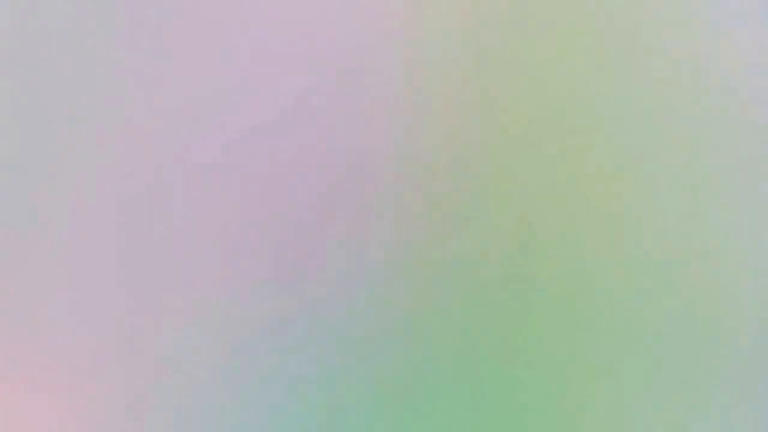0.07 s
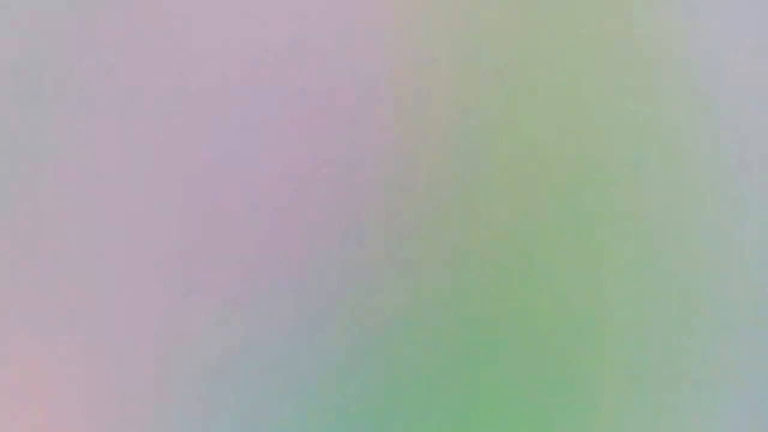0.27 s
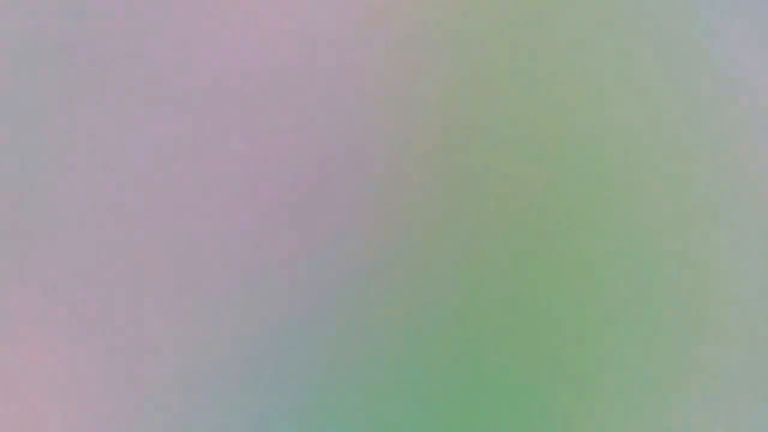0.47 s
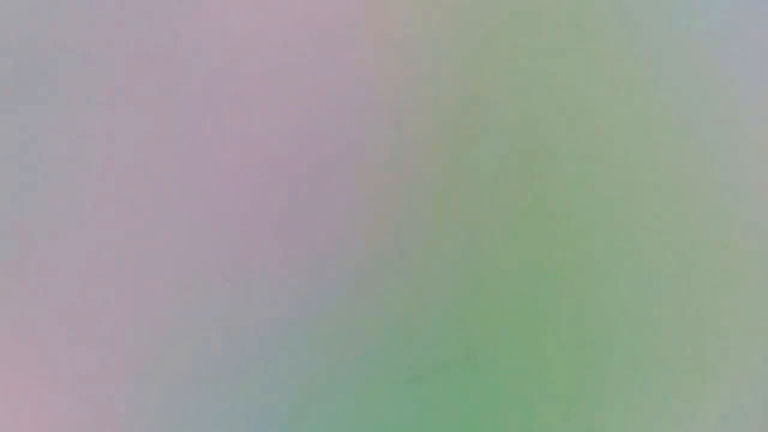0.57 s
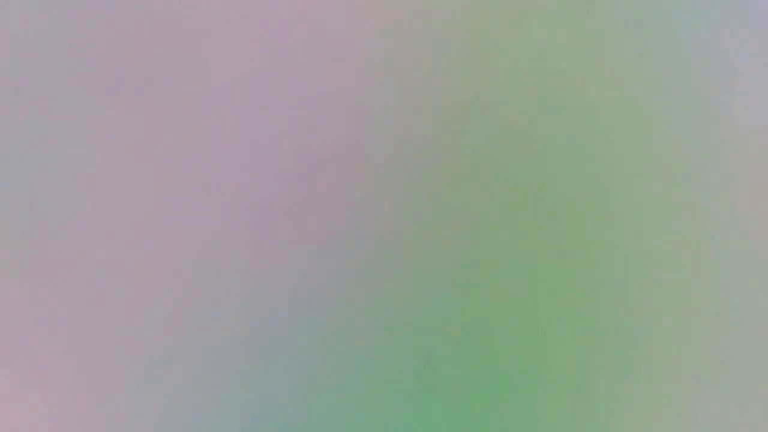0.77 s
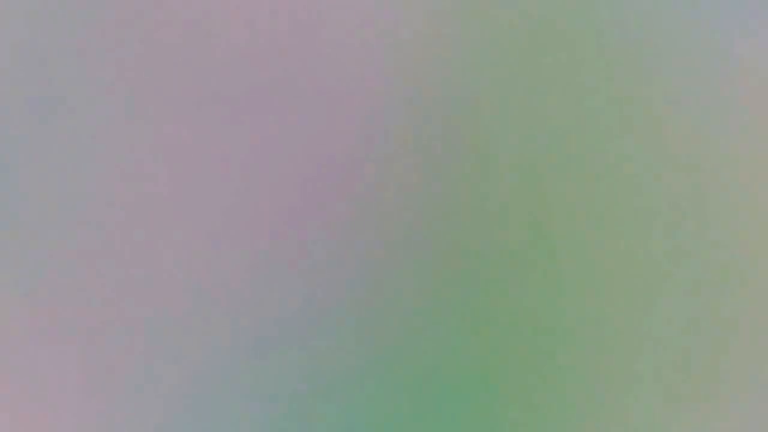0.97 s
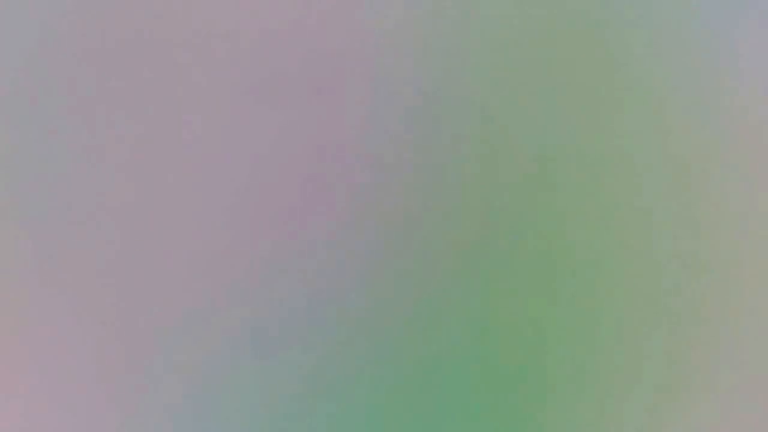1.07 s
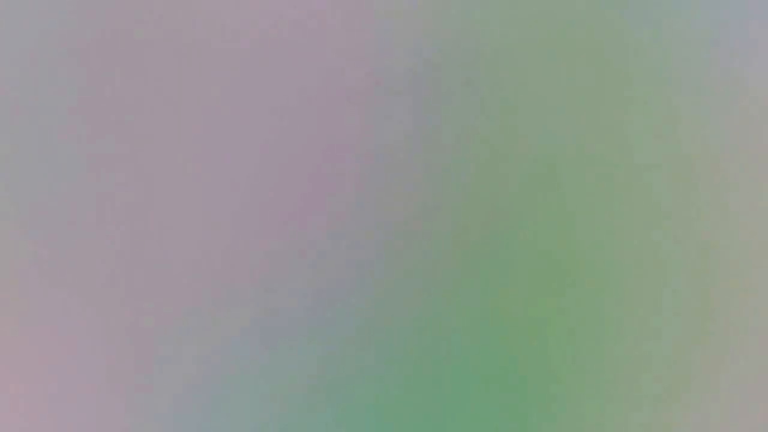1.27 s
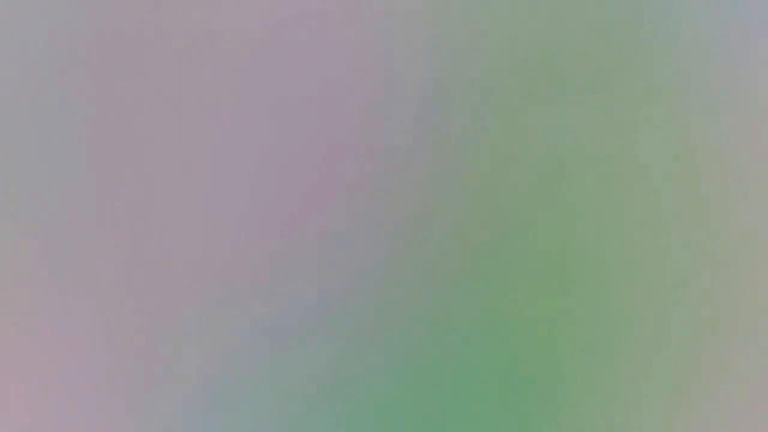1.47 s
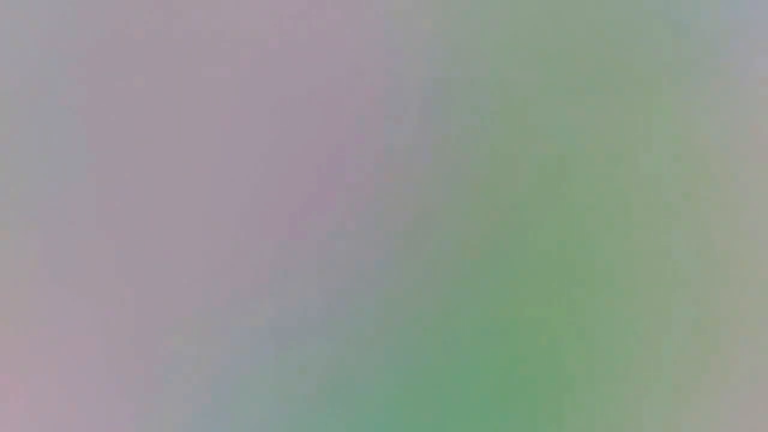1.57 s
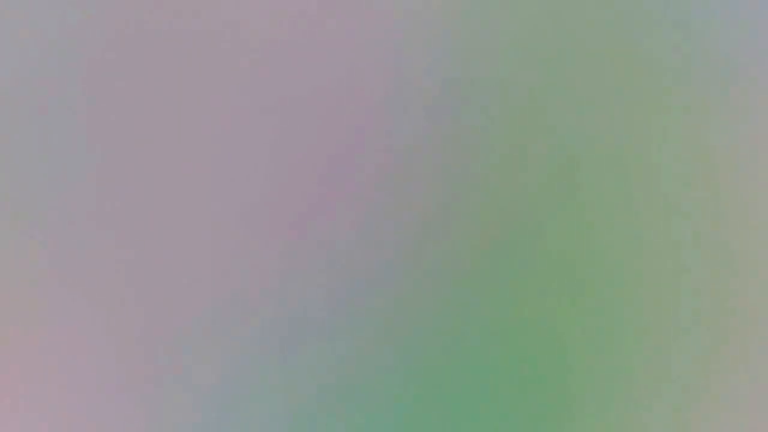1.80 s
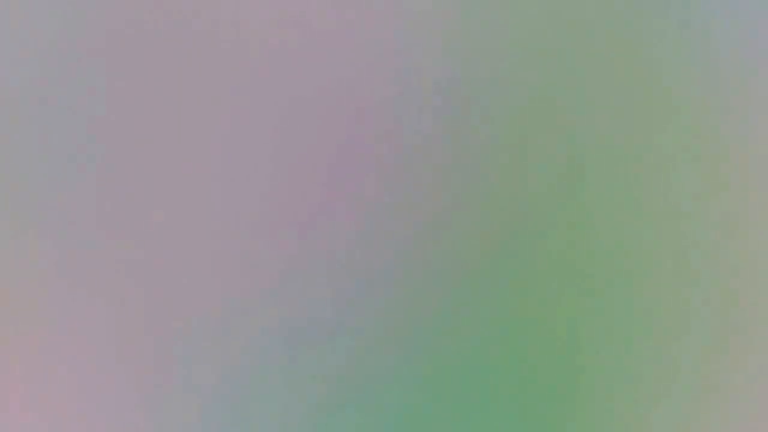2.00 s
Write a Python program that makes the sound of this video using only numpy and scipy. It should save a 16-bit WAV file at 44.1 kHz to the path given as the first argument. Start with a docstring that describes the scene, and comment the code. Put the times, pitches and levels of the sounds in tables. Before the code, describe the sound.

Footsteps crunch in snow as a metal pole scrapes and rings, with low handling thumps close by

```python
"""Someone walks through snow with a metal pole, heard close by a small pair of microphones.
Snow crunches underfoot as dull and crisp grains, and cloth swishes as finer grains in the treble.
Each move thumps through the microphone's housing as a low, sagging swing with an uneven rumble.
The pole rings in its bending modes when its tip scrapes or taps the crust; bits of crust rustle,
a small hard part ticks, and quiet air and hiss lie underneath."""
import sys
import numpy as np
from scipy import signal
from scipy.fft import rfft, irfft
from scipy.io import wavfile
from scipy.ndimage import uniform_filter1d

SR = 44100
rng = np.random.default_rng(int(sys.argv[2]) if len(sys.argv) > 2 else 0)


def generate_wav(signal):
    """Clip the signal to [-1, 1] and save it as 16-bit WAV at the path in sys.argv[1]."""
    frames = np.transpose(np.atleast_2d(signal))
    scaled = np.clip(frames, -1, 1) * 32767
    pcm = np.round(scaled).astype(np.int16)
    wavfile.write(sys.argv[1], SR, pcm)


def magnitude_from_level(level_db):
    """Linear magnitude for a level in decibels (20 dB per decade)."""
    exponent = np.asarray(level_db, float) / 20
    return 10 ** exponent


N = 90052  # length in samples
SNOW_GRAINS_PER_S, SNOW_SPREAD_DB = 3500, 2.5  # for crunch and rustle


def evened(x):
    """Scales to rms 1."""
    return x / np.sqrt(np.mean(x ** 2) + 1e-20)


def colour(x, points):
    """Filters x by a spectrum of (f/Hz, level/dB) points, joined along log frequency."""
    f, db = np.transpose(points)
    hz = np.fft.rfftfreq(x.shape[-1], 1 / SR)
    gain = magnitude_from_level(np.interp(np.log(hz + 1), np.log(f + 1), db))
    return irfft(rfft(x) * gain, x.shape[-1])


def level(curve):
    """Gain over time from rows that begin (t/s, level/dB)."""
    s, db = np.transpose(curve)[:2]
    return magnitude_from_level(np.interp(np.arange(N) / SR, s, db))


def add(mix, s, sound):
    """Mixes a sound in at time s, cut at the end of the mix."""
    part = mix[round(s * SR):][:len(sound)]
    part += sound[:len(part)]


def grains(per_s, spread_db):
    """Sparse clicks at random times, of random sign and uneven size."""
    size = magnitude_from_level(spread_db * np.minimum(rng.exponential(1, N), 5))
    struck = rng.random(N) < per_s / SR
    return size * struck * rng.choice([-1., 1.], N)


def patchy(x):
    """Lets random patches of time and frequency swell and sink."""
    patch_db = 3  # rms swing
    z = signal.stft(x, nperseg=256)[2]
    field = uniform_filter1d(rng.standard_normal(z.shape), 8, 0)
    field = evened(uniform_filter1d(field, 8, 1))
    return signal.istft(z * magnitude_from_level(patch_db * field), nperseg=256)[1][:N]


def crunch():
    """Snow packs down dully while crystals break in crisp grains; the share sets the power of each."""
    # loudness of the snow and how crisp it is: t/s, level/dB, crisp share/0-1
    steps = [(0, -58.5, 1), (0.018, -63, 0.3), (0.053, -52, 0.04), (0.07, -69, 0), (0.13, -62, 1),
             (0.172, -69, 0.35), (0.182, -42.5, 0), (0.205, -52.5, 0.53), (0.25, -53, 1),
             (0.268, -57, 0.98), (0.39, -55.5, 0.53), (0.438, -40.5, 0.06), (0.462, -60, 0.63),
             (0.495, -56.5, 0.63), (0.517, -48.5, 0.55), (0.564, -60.5, 0.04), (0.593, -51, 0.49),
             (0.657, -65, 0), (0.754, -74, 0.5), (0.771, -58.5, 0.12), (0.788, -73, 0.66), (0.809, -60, 1),
             (0.847, -74.5, 0.95), (0.918, -73.5, 0.3), (0.929, -65.5, 0.8), (0.959, -47, 1),
             (0.976, -63, 1), (0.99, -50, 0.92), (1.03, -60.5, 0.88), (1.13, -62.5, 0.14),
             (1.153, -56, 0.19), (1.208, -72, 0.62), (1.25, -60, 0.07), (1.5, -66.5, 0.72),
             (1.58, -70, 0.4), (2.0, -75.5, 1), (2.04, -60.5, 0.08)]
    # spectrum of the dull packing: f/Hz, level/dB per Hz
    dull_colour = [(110, -18.5), (200, -1.5), (320, -5.5), (600, -24.5), (1500, -55)]
    # spectrum of the crisp crackle: f/Hz, level/dB per Hz
    crisp_colour = [(250, 0), (500, -1), (1000, -6), (1500, -19.5), (3000, -26), (7000, -35.5)]
    s, _, share = np.transpose(steps)
    share = np.clip(np.interp(np.arange(N) / SR, s, share), 0, 1)
    dull = evened(colour(patchy(grains(SNOW_GRAINS_PER_S, SNOW_SPREAD_DB)), dull_colour))
    crisp = evened(colour(patchy(grains(SNOW_GRAINS_PER_S, SNOW_SPREAD_DB)), crisp_colour))
    return level(steps) * (np.sqrt(1 - share) * dull + np.sqrt(share) * crisp)


def swish():
    """Rubbing cloth gives fine bright grains, dense and fairly even in size."""
    # loudness of the cloth: t/s, level/dB
    rubs = [(0, -44), (0.03, -51.5), (0.1, -57.5), (0.23, -62.5), (0.25, -54), (0.28, -69), (0.33, -60),
            (0.38, -68), (0.42, -60), (0.46, -70), (0.52, -62.5), (0.56, -69.5), (0.6, -63.5), (0.7, -73),
            (0.74, -62.5), (0.795, -72), (0.799, -56), (0.84, -82), (0.92, -71.5), (0.93, -57),
            (1.03, -67.5), (1.15, -65), (1.28, -68.5), (1.4, -58.5), (1.45, -63), (1.46, -70.5),
            (1.59, -68), (1.61, -60.5), (1.63, -65.5), (1.69, -68.5), (1.71, -60), (1.725, -70.5),
            (2.04, -69.5)]
    # spectrum of the cloth: f/Hz, level/dB per Hz
    cloth_colour = [(2000, -18), (4500, -22), (6300, -9.5), (8300, -1), (10000, -9), (12000, -19.5),
                    (14200, -25)]
    cloth = colour(patchy(grains(per_s=7400, spread_db=1.5)), cloth_colour)
    return level(rubs) * evened(cloth)


def rustle():
    """Bits of crust break away in short grainy bursts, each in its own band."""
    # bursts: start t/s, length/s, level/dB, centre f/Hz
    bursts = [(0, 0.018, -56, 5300), (0.426, 0.016, -57, 263), (.921, 0.034, -56, 790),
              (1.335, 0.13, -69.5, 5640), (1.595, 0.029, -66, 4180)]
    out = np.zeros(N)
    for s, length, db, hz in bursts:
        band = [(hz / 1.9, -30), (hz, 0), (hz * 1.56, -30)]
        grit = evened(colour(grains(SNOW_GRAINS_PER_S, SNOW_SPREAD_DB), band))
        grit = grit[:round(length * SR)]
        add(out, s, magnitude_from_level(db) * np.sqrt(np.hanning(len(grit))) * grit)
    return out


def air_and_hiss():
    """Steady outdoor air and microphone hiss, as coloured noise."""
    # spectrum of the quiet bed: f/Hz, level/dB per Hz
    bed_colour = [(60, -1), (150, -10.5), (400, -31.5), (1600, -16.5), (3300, -19.5), (7500, -22),
                  (10800, -12), (14200, -15)]
    return magnitude_from_level(-69) * evened(colour(rng.standard_normal(N), bed_colour))


def thumps():
    """Low swings that start softly, sag in pitch and die or are stopped by the next, each with a rumble."""
    # dull thumps: t/s, level/dB, starting pitch f/Hz, t60/s
    hits = [(0.005, -40, 57.6, 0.35), (0.044, -40.5, 80, 0.14), (0.089, -54.5, 57.3, 0.48),
            (0.345, -44.5, 61.3, 0.81), (0.413, -28.5, 62, 0.21), (0.499, -41.5, 60, 0.16),
            (0.641, -55, 60.5, 0.57), (0.955, -52, 60, 0.86), (1.046, -35.5, 60.4, 0.3),
            (1.119, -45, 54, 0.52), (1.282, -31.5, 62, 0.27), (1.31, -31.5, 117, 0.068),
            (1.348, -38, 69.8, 0.16), (1.408, -38.5, 54, 0.26), (1.451, -33, 62.3, 0.22),
            (1.532, -30, 97, .1), (1.588, -45.5, 55, 0.46), (1.647, -44, 71.6, 0.19),
            (1.71, -32.5, 80, 0.056), (1.739, -30.5, 81.4, 0.17), (1.825, -28.5, 101, 0.038),
            (1.851, -40.5, 63.2, 0.26), (1.944, -36, 76, 0.08), (1.971, -41, 95.5, 0.2),
            (1.996, -42.5, 55, 0.18)]
    # spectrum of the uneven rumble: f/Hz, level/dB per Hz
    rumble_colour = [(25, -42), (70, 17.5), (150, 8), (300, -39.5)]
    rise_s, cut_s = 0.0058, 0.013  # soft start; stop once the next thump begins
    decay_bend, sag = 1.237, 0.14  # above 1 the decay steepens; pitch falls by 2 * sag over t60
    second_db, rumble_db = -20.5, -12  # second harmonic and rumble against the swing
    out, shaken, t = np.zeros(N), np.zeros(N), np.arange(SR // 2) / SR
    next_starts = [row[0] for row in hits[1:]] + [np.inf]
    for (s, db, hz, t60), next_s in zip(hits, next_starts):
        phase = 2 * np.pi * hz * (t - sag * t ** 2 / t60)
        rise = 1 - np.exp(-(t / rise_s) ** 2)
        decay = magnitude_from_level(db - 60 * (t / t60) ** decay_bend)
        stop = np.exp(-(np.maximum(t + s - next_s, 0) / cut_s) ** 2)
        swing = rise * decay * stop
        add(out, s, swing * (np.sin(phase) + magnitude_from_level(second_db) * np.sin(2 * phase)))
        add(shaken, s, swing)
    rumble = evened(colour(rng.standard_normal(N), rumble_colour))
    return out + magnitude_from_level(rumble_db) * shaken * rumble


def pole():
    """Each scrape swings up the modes near its own pitch, unevenly, then lets them ring out.

    A tight grip pulls decays towards a short one and lifts the low modes until it lets go."""
    # bending modes of the pole: f/Hz, relative level/dB, free t60/s
    modes = [(383, 3, 0.64), (621, -9.5, 1), (897.5, 3, 0.45), (1237, -3, 0.053), (1638, -8, 0.34),
             (2091, -10, 0.37), (2610, -10, 0.12)]
    # the tip drags or knocks: start t/s, length/s, level/dB, strongest near f/Hz, grip/0-1
    scrapes = [(0.176, 0.0047, -50, 1500, 0.25), (0.194, 0.019, -40.5, 570, 0.93),
               (0.226, 0.0088, -43, 470, 0.94), (0.229, 0.011, -47, 2160, 0.62),
               (0.234, 0.016, -48.5, 744, 0.3), (0.283, 0.0046, -57.5, 1850, 0.66),
               (0.306, 0.021, -47, 1890, 0.28), (0.323, 0.0092, -63.5, 440, 0),
               (0.401, 0.01, -53.5, 2340, 0.55), (1.361, 0.057, -63.5, 910, 0.66),
               (1.431, 0.0083, -48.5, 3050, 0.43), (1.596, 0.015, -51, 754, 0.06),
               (1.601, 0.017, -51, 3040, 1), (1.673, 0.0074, -61, 770, 0.52),
               (1.707, 0.011, -63, 2900, 0.8)]
    reach_octaves, rough = 0.65, 0.41  # spread over the modes; unevenness of level and phase
    grip_t60_s, grip_shift_hz, let_go_s = 0.041, 55, 0.044  # the first two at full grip
    out, t = np.zeros(N), np.arange(SR // 2) / SR
    hz, db, t60 = np.transpose(modes)[:, :, None]
    start_turns = rng.random(hz.shape)
    for s, length, scrape_db, near_hz, grip in scrapes:
        grip = np.clip(grip, 0, 1)
        reach = np.exp(-.5 * (np.log2(hz / near_hz) / reach_octaves) ** 2)
        ringing = t60 ** (1 - grip) * grip_t60_s ** grip
        wander = uniform_filter1d(rng.standard_normal((2, len(modes), len(t))), size=300)
        shaky, skid = evened(wander) * np.sqrt(grip)
        rise = np.minimum(t / length, 1) ** .5
        decay = magnitude_from_level(-60 * np.maximum(t - length, 0) / ringing)
        swing = rise * decay * (1 + rough * shaky)
        # the pitch lift dies away with let_go_s; here it is summed into turns
        lift_turns = grip_shift_hz * grip ** 2 * (hz < 1400) * let_go_s * (1 - np.exp(-t / let_go_s))
        phase = 2 * np.pi * (hz * (s + t) + start_turns + lift_turns)
        rings = magnitude_from_level(scrape_db + db) * reach * swing * np.sin(phase + rough * 2 * skid)
        add(out, s, rings.sum(0))
    return out


def ticks():
    """A small hard part clicks, ringing in a few quickly damped modes."""
    # clicks: t/s, level/dB
    clicks = [(1.1058, -41)]
    # what a click rings: f/Hz, relative level/dB, t60/s
    click_modes = [(1940, -16, 0.029), (2320, -14, 0.037), (6200, -11.5, 0.01), (8620, 1.5, 0.025)]
    rise_s = 0.00075
    out, t = np.zeros(N), np.arange(SR // 20) / SR
    tick = sum(magnitude_from_level(db - 60 * t / t60) * np.sin(2 * np.pi * hz * t) for hz, db, t60 in click_modes)
    for s, db in clicks:
        add(out, s, magnitude_from_level(db) * tick * np.minimum(t / rise_s, 1))
    return out


def scene():
    """Everything is central; only the treble of cloth, air and hiss differs between the two sides."""
    # filter for the side signal: f/Hz, level/dB
    side_colour = [(2500, -52), (4200, -15.5), (7700, -7), (14000, -3)]
    mid = thumps() + pole() + crunch() + swish() + rustle() + ticks() + air_and_hiss()
    side = colour(swish() + air_and_hiss(), side_colour)  # fresh grains and noise
    return np.array([mid + side, mid - side])


def band_limit(x):
    """A steep low-pass at the top of the band."""
    return signal.sosfilt(signal.butter(12, 14660, fs=SR, output="sos"), x)


def record(dry):
    """Limits the band with a steep treble edge and returns the finished sound."""
    # treble edge: f/Hz, level/dB
    treble_edge = [(14250, 0), (14350, -80)]
    mix = colour(dry, treble_edge)
    return band_limit(mix)


dry = scene()
out = record(dry)
generate_wav(out)
```